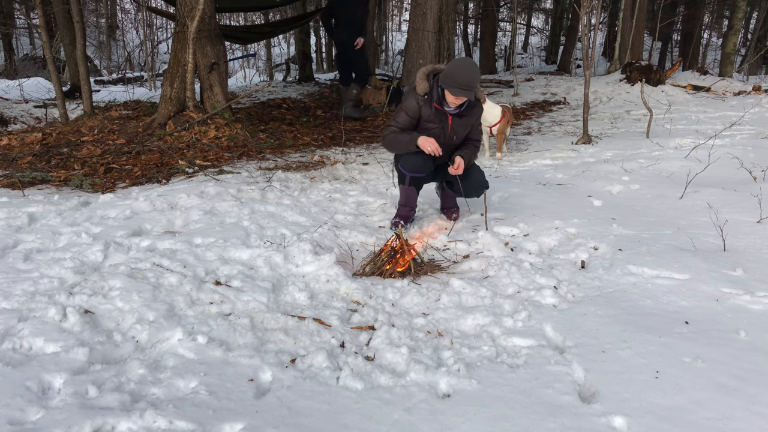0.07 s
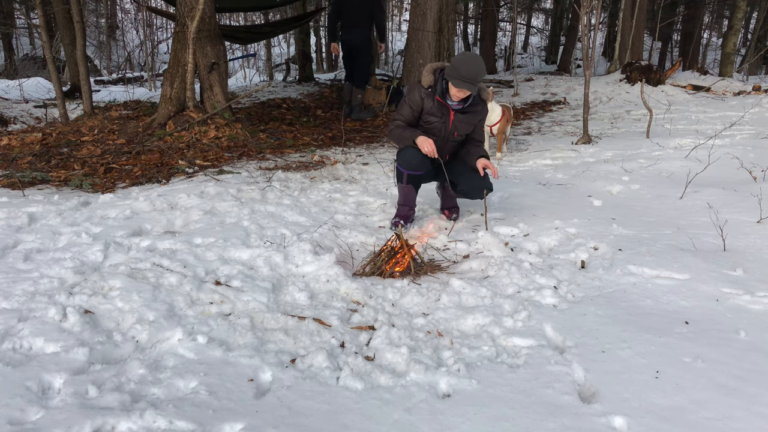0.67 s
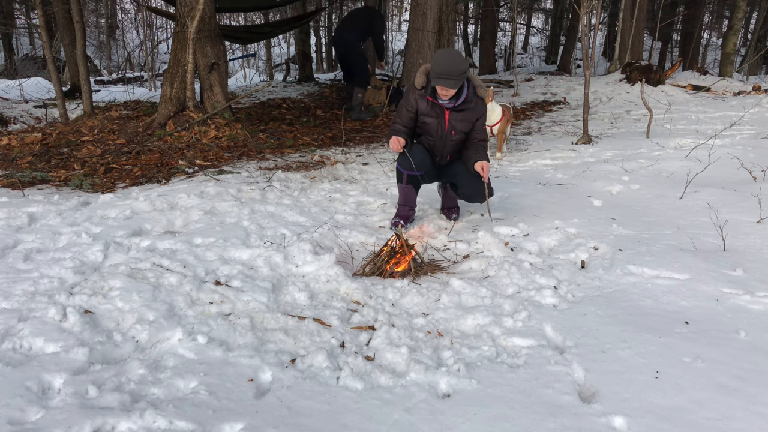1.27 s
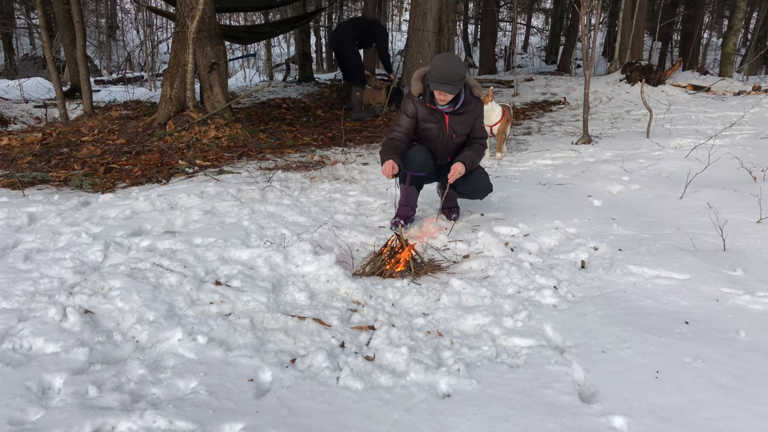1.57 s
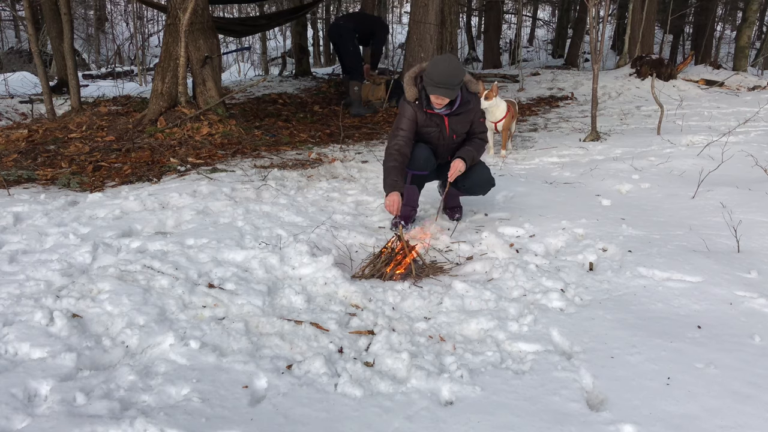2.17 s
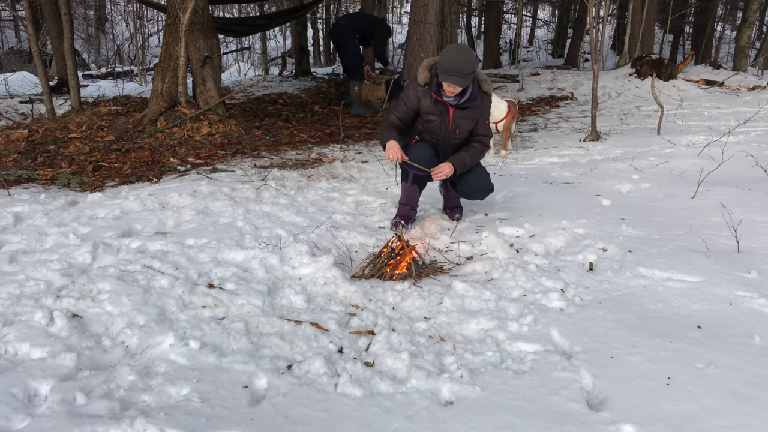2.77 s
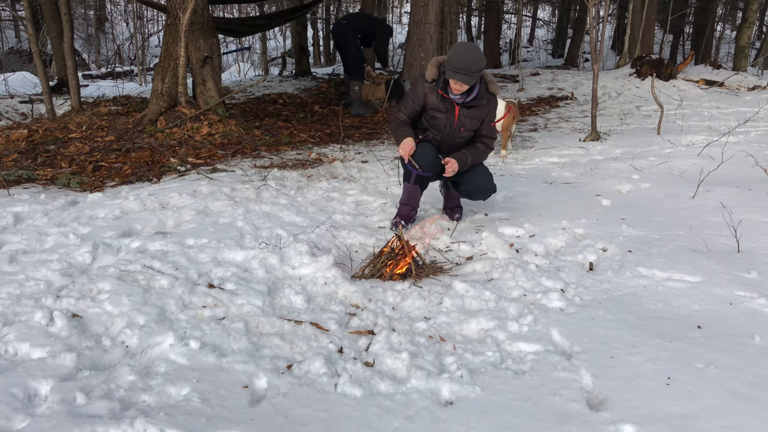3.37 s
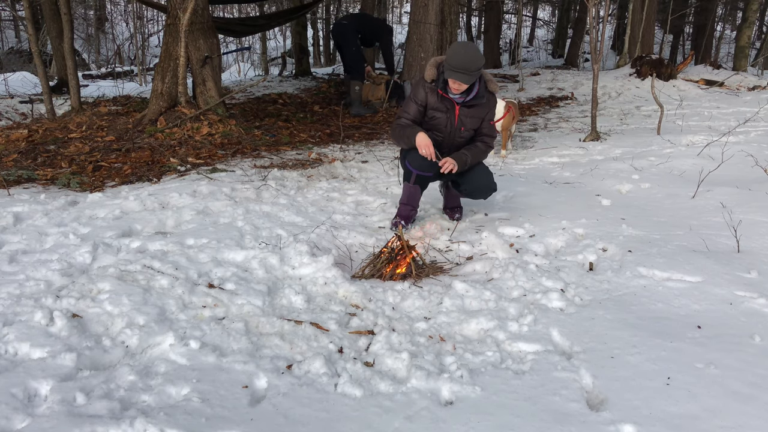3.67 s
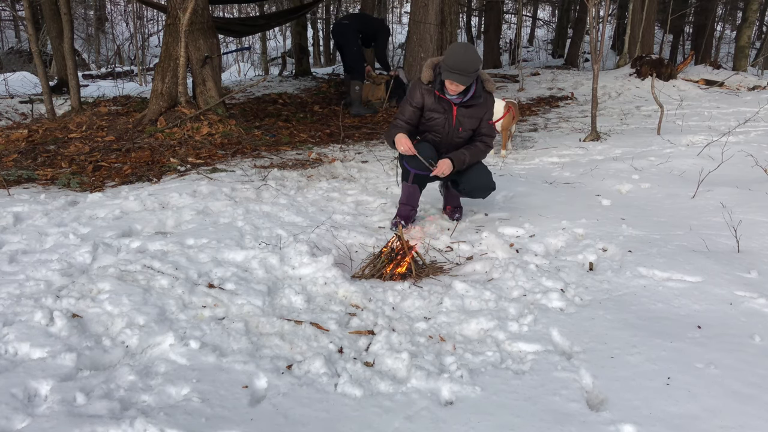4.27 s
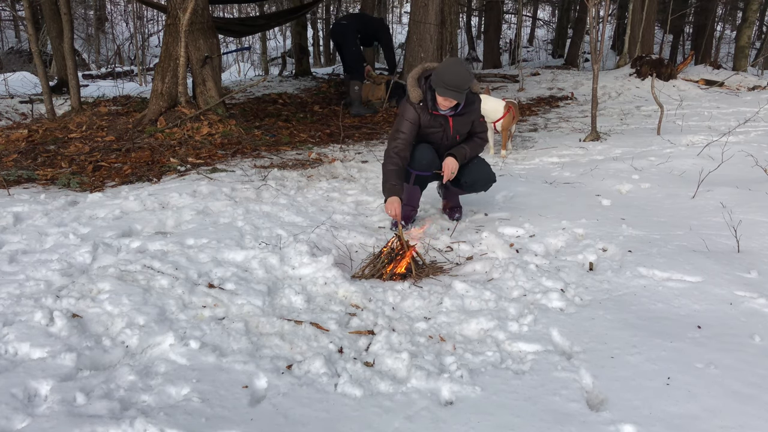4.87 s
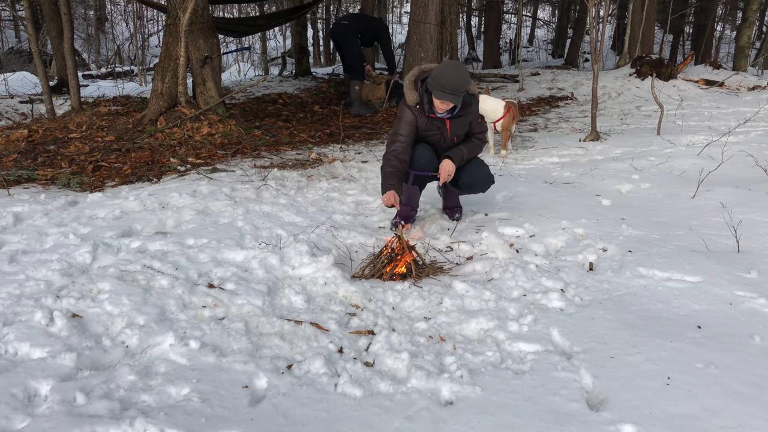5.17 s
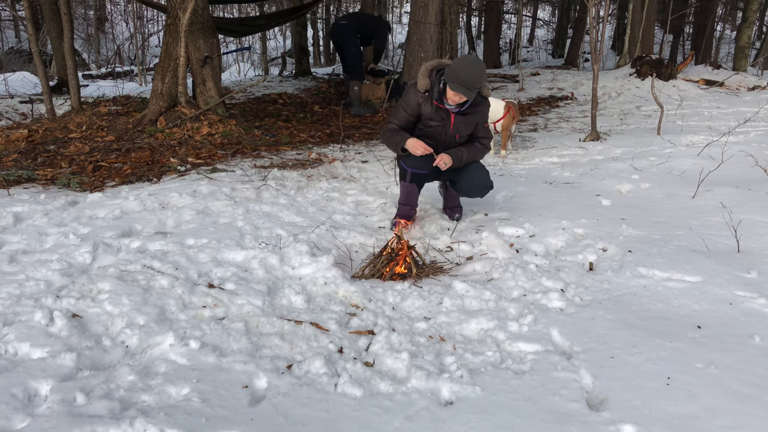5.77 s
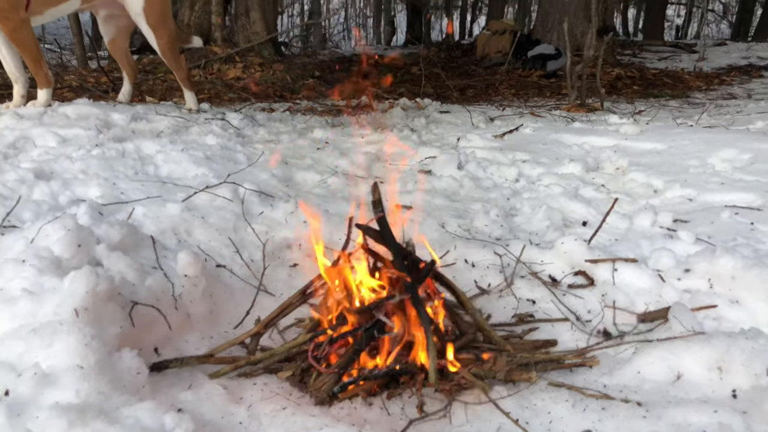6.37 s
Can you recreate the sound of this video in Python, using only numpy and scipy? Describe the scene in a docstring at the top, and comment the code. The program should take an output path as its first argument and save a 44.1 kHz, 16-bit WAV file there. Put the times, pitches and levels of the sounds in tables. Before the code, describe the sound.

A small twig fire crackles outdoors at the edge of a snowy wood, with sharp, irregular pops over a faint hiss and a low rush of flames. Beside it a few sticks are snapped, each with a slight echo off the trees, among soft thuds and light jacket rustle. A far bird gives one brief, faint note. Near the end the flames flutter closer to the microphone and one loud pop cracks.

```python
"""A small twig fire on snow at the edge of a wood, on one microphone. Gas pockets pop, scatter in the
pile and let out a fading hiss of steam over the low rush of the flames. Someone crouched beside it
breaks sticks fibre by fibre, and the trunks echo them. A jacket rustles, handling and breaking give
soft low thuds, and a far bird calls once in the wash of the wood. Near the end the background dips
briefly, then the flames flutter close to the microphone."""
import sys
import numpy as np
from scipy import signal
from scipy.fft import rfft, irfft
from scipy.io import wavfile
from scipy.ndimage import uniform_filter1d

SR = 44100
rng = np.random.default_rng(int(sys.argv[2]) if len(sys.argv) > 2 else 0)


def digitize_waveform(pressure):
    """Quantize a signal to 16-bit integers and store it at the path in sys.argv[1].

    Rows of a 2-D input are taken as channels; values are limited to [-1, 1].
    """
    field = np.atleast_2d(pressure).T
    bounded = np.clip(field, -1, 1)
    quanta = np.round(bounded * 32767).astype(np.int16)
    wavfile.write(sys.argv[1], SR, quanta)


N = 282681
TIME = np.arange(N) / SR

# spectra of the distant wood, the flames and the sizzling sap: f/Hz, relative level/dB
AIR_SPECTRUM = [(150, -5), (350, 0), (600, 0.5), (1100, 1), (1800, -2.5), (3000, -10), (5000, -17),
                (12000, -23)]
FLAME_SPECTRUM = [(20, -41), (42, -11.5), (70, 2), (110, 0.5), (200, -7), (330, -9.5), (700, -23),
                  (1500, -50)]
SIZZLE_SPECTRUM = [(1500, -1), (3000, 1.5), (5000, 2.5), (8000, 0.5), (11000, -4), (15000, -2.5),
                   (16000, -4)]
# low rush of the flames, louder from close by: t/s, level/dB
FLAME_LEVELS = [(0, -57), (2.2, -55.5), (4.2, -59), (5.2, -54), (5.88, -58), (5.94, -49.5), (6.41, -47.5)]
# fine hiss of sap and cloth: t/s, relative level/dB
HISS_LEVELS = [(0, -59.5), (.25, -54), (.48, -68), (.68, -54), (.98, -67.5), (1.6, -62), (2.35, -63),
               (2.55, -61), (3.1, -58), (3.85, -65), (4.05, -72), (4.25, -73), (4.42, -60), (4.75, -70.5),
               (5.9, -65), (6.41, -53.5)]
# brief dip of the background: t/s, gain/dB
BACKGROUND_DIP = [(5.855, 0), (5.89, -13), (5.905, 0)]
# the far bird's note: t/s, length/s, f/Hz
BIRD_NOTE = (5.611, .028, 930)
# brushes of sleeve and twig: middle t/s, length/s, centre f/Hz, level/dB
SLEEVE_BRUSHES = [(0.213, 0.13, 1200, -53), (2.42, 0.12, 4630, -56.5), (2.808, 0.15, 7300, -62),
                  (3.792, 0.098, 7200, -55), (3.9, 0.25, 8300, -56), (5.064, 0.057, 870, -51),
                  (6.021, 0.045, 1090, -48), (6.35, 0.14, 5800, -50.5)]
# tongues of flame tearing loose: middle t/s, length/s, centre f/Hz, level/dB
FLAME_PUFFS = [(5.96, 0.073, 154, -46.5), (6.155, 0.062, 127, -43.5), (6.27, .19, 148, -40.5)]
# soft low thuds, from handling and from sticks breaking: t/s, level/dB, lowest mode f/Hz
LOW_THUDS = [(.152, -38, 119.5), (1.15, -42, 128), (1.239, -46.5, 254), (1.762, -36.5, 111),
             (2.144, -38, 171), (2.953, -36, 116), (5.056, -32, 128), (5.905, -35, 224),
             (6.031, -25.5, 203)]
# modes of a thud: multiple of the lowest, relative level/dB, t60/s
LOW_THUD_MODES = [(1, 1, 0.068), (2.52, -7.5, 0.065)]
# what the trees scatter back: f/Hz, relative level/dB
TREE_SPECTRUM = [(500, -13.5), (1300, -11), (3500, 2.5), (7000, 0.5), (13000, -1)]
# echoes off single trunks: delay/s, relative level/dB
TRUNK_ECHOES = [(0.0235, -22.5), (0.0359, -15)]
# sticks breaking: t/s, crack level/dB, then relative to it body/dB, middle/dB, top/dB; length/ms
STICK_SNAPS = [(2.1369, 4, -11.5, -2.5, -1, 3), (2.9488, 8.5, 7.5, -2.5, 0, 3.34),
               (3.6035, 4.5, -4.5, -7.5, -5.5, 4.9), (4.4566, 5.5, 4, -6.5, -5, 4.6)]
# gas pockets bursting: t/s, crack level/dB, then relative to it body/dB, top/dB
GAS_POPS = [(.0446, 3, -14.5, 0), (.0672, -2, -5, -5), (0.1449, -17.5, 8.5, 4), (.2069, -9.5, -0.5, -2),
            (0.4214, -19.5, 1, -3), (0.5506, -4.5, 7.5, 2.5), (0.5939, -7.5, -2, -1), (0.6288, -11, -1, -8),
            (0.7037, -8.5, 1.5, -7), (0.842, -0.5, -8, -7.5), (0.8732, -18.5, 6, -12),
            (1.1303, -4, -2, -11), (1.1487, -3.5, -9, -4), (1.1716, -16, 7, -2), (1.2442, -7.5, 8.5, -9),
            (1.3864, 6, -17, -2), (1.6498, -5.5, -16, -3), (1.6861, -8.5, -19, -8),
            (1.7608, -12.5, 0.5, 3.5), (1.8465, -17.5, -1, 6), (1.8715, -2.5, -21, -4),
            (1.9007, -13.5, 12.5, -2), (1.948, -16, -6, 0), (2.215, -3, -4, 1.5), (2.2287, -12.5, 4, 5),
            (2.321, -8.5, -23, 1.5), (2.4161, -19.5, -7, -2), (2.5992, -14, -1, 0), (2.7942, -10.5, -2, -7),
            (2.8853, -13, 4, -6), (3.0596, -11, 0.5, -5), (3.1909, 17, -13.5, -1), (3.3312, -1, -6, 1),
            (3.4033, -13, -2, 2), (3.4083, -7.5, 3, -2), (3.4779, -2, 0.5, -3), (3.4906, 0.5, -8.5, -3.5),
            (3.758, -18.5, 10, 0), (4.1127, -20.5, 3.5, 4), (4.1488, -18.5, 3, -5), (4.1741, -12, -24, -6),
            (4.2934, -19, 7, -1), (4.4405, -11, -2, -1), (4.4523, -6, -8, -8), (4.7617, -7, -9.5, 0),
            (4.8356, -14, -14, 2), (4.9161, 6, -11.5, 2), (4.9708, 10, -3.5, -5), (5.0456, -12.5, 7.5, -3),
            (5.1585, -6.5, -6, -0.5), (5.189, -6.5, 1.5, -3), (5.2635, 12.5, -6, -7.5),
            (5.372, -14.5, 1, -6), (5.5394, 3, -15.5, -5), (5.6244, -11.5, -3.5, 2.5),
            (5.6981, -17, 0.5, -1), (5.9256, 10.5, -3.5, -5.5), (5.976, 5.5, -6.5, -8.5),
            (6.2058, 5.5, -9.5, -7.5), (6.3007, -6, -6, -6), (6.3208, -13.5, -2, -3),
            (6.4005, 24, -7.5, -5.5)]


def undb(db):
    """Decibels to gain."""
    return 10 ** (np.asarray(db) / 20)


def unit(x):
    """Scale to an energy of one."""
    return x / np.sqrt(np.sum(x ** 2))


def add(out, x, start):
    """Mix x into out from a time in seconds."""
    i = max(int(round(start * SR)), 0)
    out[i:i + len(x)] += x[:max(len(out) - i, 0)]


def level_db(points):
    """Join (t/s, level/dB) points over the whole scene."""
    return np.interp(TIME, *np.transpose(points))


def spectrum_db(points, size):
    """Join (f/Hz, level/dB) points on a log-frequency axis over the bins of a transform."""
    hz, db = np.transpose(points)
    return np.interp(np.log(np.fft.rfftfreq(size, 1 / SR) + 1), np.log(hz), db)


def colour(x, points):
    """Give x a spectrum and an rms of one."""
    shaped = rfft(x) * undb(spectrum_db(points, len(x)))
    return unit(irfft(shaped, len(x))) * np.sqrt(len(x))


def causal(db):
    """The quickest impulse response with these gains (minimum phase)."""
    cepstrum = irfft(np.log(undb(db)))
    half = len(cepstrum) // 2
    cepstrum[1:half] *= 2
    cepstrum[half + 1:] = 0
    return irfft(np.exp(rfft(cepstrum)))


def walk(rate_hz):
    """Smooth random drift with a spread near one."""
    hold = int(SR / rate_hz)
    steps = np.repeat(rng.standard_normal(N // hold + 1), hold)
    return uniform_filter1d(uniform_filter1d(steps, hold), hold)[:N] * np.sqrt(2)


def grit(size, grain_db):
    """Grainy noise: every sample has a random level of its own."""
    return rng.standard_normal(size) * undb(grain_db * rng.standard_normal(size))


def distant_air(db=-56, sway_db=1.13):
    """The even wash of the wood, far behind the fire."""
    return colour(rng.standard_normal(N), AIR_SPECTRUM) * undb(db + sway_db * walk(14))


def far_bird(db=-42, second_db=-5, waver=.008, tail_db=-8, tail_s=.03):
    """One short note of two harmonics, smeared by the trees on its way to the microphone."""
    start, length, pitch_hz = BIRD_NOTE
    out, t = np.zeros(N), np.arange(SR // 4) / SR
    phase = 2 * np.pi * np.cumsum(pitch_hz * (1 + waver * walk(200)[:len(t)])) / SR
    gate = np.interp(t, [0, length / 10, length / 2, length], [0, 1, 1, 0])
    note = undb(db) * gate * (np.sin(phase) + undb(second_db) * np.sin(2 * phase))
    smear = unit(rng.standard_normal(len(t)) * np.exp(-t / tail_s))
    add(out, note, start)
    add(out, undb(tail_db) * signal.fftconvolve(note, smear), start + length / 2)
    return out


def wood_echo(x, echo_db, trunk_db, gap_s=0.017, early_s=0.018, late_s=0.031, late_db=-14, grain_db=5.5):
    """Snow swallows the near reflections; after a gap the trees return a fading wash of small echoes."""
    t = np.arange(int(SR * .7)) / SR
    since = np.maximum(t - gap_s, 0)
    power_fade = np.exp(-since / early_s) + undb(late_db) ** 2 * np.exp(-since / late_s)
    power_fade *= np.minimum(since / 0.002, 1)
    grain = unit(undb(grain_db * rng.standard_normal(N))) * np.sqrt(N)
    out, edges_hz = np.zeros(N), np.geomspace(400, 16000, 8)
    for low, high in zip(edges_hz, edges_hz[1:]):
        band = signal.butter(2, [low, high], "band", fs=SR, output="sos")
        # echoes from all sides add in power, not in phase
        power = signal.fftconvolve(signal.sosfilt(band, x) ** 2, power_fade / power_fade.sum())
        carrier = unit(signal.sosfilt(band, grain * rng.standard_normal(N)))
        tree_db = np.interp(np.sqrt(low * high), *np.transpose(TREE_SPECTRUM))
        out += carrier * np.sqrt(N * power[:N].clip(0)) * undb(echo_db + tree_db)
    # a trunk mirrors only waves shorter than its girth
    bright = signal.sosfilt(signal.butter(1, 2500, "high", fs=SR, output="sos"), x)
    for delay, db in TRUNK_ECHOES:
        add(out, undb(db + trunk_db) * bright, delay)
    return out


def low_thuds(contact_s=0.0029):
    """Handling and breaking sticks give soft thuds, each of two low, quickly damped modes."""
    out, t = np.zeros(N), np.arange(SR // 6) / SR
    for start, db, hz in LOW_THUDS:
        ring = sum(undb(mode_db - 60 * t / t60) * np.sin(2 * np.pi * hz * multiple * t)
                   for multiple, mode_db, t60 in LOW_THUD_MODES)
        add(out, undb(db) * ring * np.minimum(t / contact_s, 1), start)
    return out


def swells(table, width, grain_db):
    """Brief swells of grainy noise, each around one pitch."""
    out = np.zeros(N)
    for middle, length, hz, db in table:
        size = int(length * SR)
        hump = [(hz / 4, -30), (hz / (1 + width), -9), (hz, 0), (hz * (1 + width), -9), (hz * 8, -60)]
        noise = colour(grit(size, grain_db), hump)
        add(out, undb(db) * noise * np.hanning(size), middle - length / 2)
    return out


def jacket_rustle():
    """Friction of sleeve and twig beside the fire."""
    return swells(SLEEVE_BRUSHES, width=0.43, grain_db=3.5)


def flame_puffs():
    """Burning gas tears loose in low puffs close to the microphone."""
    return swells(FLAME_PUFFS, width=0.58, grain_db=-3.5)


def flame_rush(flutter_db=1.34):
    """Turbulent flames: a low noise that flutters as they lick upward."""
    roar = colour(rng.standard_normal(N), FLAME_SPECTRUM)
    return roar * undb(level_db(FLAME_LEVELS) + flutter_db * walk(22))


def steam_level_db(jet_db=-62, db_per_crack_db=0.49, attack_s=0.014, fade_s=0.17):
    """Level of the hiss: every loud pop opens a jet of steam that fades back into the sizzle."""
    power, t = undb(level_db(HISS_LEVELS)) ** 2, np.arange(SR) / SR
    jet = np.minimum(t / attack_s, 1) * np.exp(-t / fade_s)
    for start, crack_db, _, _ in GAS_POPS:
        add(power, (undb(jet_db + db_per_crack_db * crack_db) * jet) ** 2, start)
    return 10 * np.log10(power)


def sizzle(db, grain_db=4.5, flicker_db=3.0, gain_db=1.0):
    """Boiling sap and rubbing cloth: a fine, grainy hiss."""
    return colour(grit(N, grain_db), SIZZLE_SPECTRUM) * undb(db + gain_db + flicker_db * walk(70))


def twig(push, crack_db, body_db, middle_db, top_db, size=1024):
    """A push sounds through one twig: its broad colour plus uneven, heavily damped resonances."""
    shape = [(40, body_db - 36.5), (200, body_db - 4.5), (550, body_db - 6.0), (1200, body_db + .5),
             (3300, middle_db - .5), (7500, 1.0), (12500, top_db), (16000, top_db - 8.5)]
    resonance_hz = np.geomspace(2000, 16000, 18)
    ripple = np.column_stack([resonance_hz, rng.uniform(-2.2, 2.2, len(resonance_hz))])
    response = causal(crack_db + spectrum_db(shape, size) + spectrum_db(ripple, size))
    return signal.fftconvolve(push, response)


def burst(scatter_db, scatter_s=0.0015, linger_s=0.0062, linger_db=-22, stick_hz=2200, size=1024):
    """One sharp pulse, then a few milliseconds of reflections among the sticks."""
    t = np.arange(size) / SR
    fade = np.exp(-t / scatter_s) + undb(linger_db) * np.exp(-t / linger_s)
    fade *= np.minimum(t / 0.00051, 1) ** 2
    # long waves pass round thin sticks, so only the treble is scattered
    treble = signal.butter(2, stick_hz, "high", fs=SR, output="sos")
    push = undb(scatter_db) * unit(signal.sosfilt(treble, rng.standard_normal(size) * fade))
    push[0] += 1  # the direct pulse
    return unit(push)


def stick_snaps(first_db=-8, fibre_body_db=-13, release_s=0.00058, linger_db=-26, linger_s=0.03):
    """A stick gives with one deep crack, then its fibres tear in a dense, bright run until it parts."""
    out, t = np.zeros(N), np.arange(1400) / SR
    for start, crack_db, body_db, middle_db, top_db, length_ms in STICK_SNAPS:
        middle_db -= 2  # softer middle in both crack and fibres
        since_parting = np.maximum(t - length_ms / 1000, 0)
        fade = np.exp(-since_parting / release_s) + undb(linger_db) * np.exp(-since_parting / linger_s)
        fibres = unit(grit(len(t), grain_db=3) * fade)
        add(out, twig(fibres, crack_db, body_db + fibre_body_db, middle_db, top_db), start)
        # the first crack carries nearly all of the body but little of the treble
        push = burst(scatter_db=-8)
        add(out, twig(push, crack_db + first_db, body_db - first_db, middle_db - first_db, top_db), start)
    return out


def bark_ticks(sizzle_db, above_db=25.5, spread_db=4.8, body_db=-7, middle_db=-4, vary_db=5, count=130):
    """Tiny pops in the bark, mostly faint, louder while the fire sizzles."""
    out = np.zeros(N)
    for when, luck, body, top in rng.random((count, 4)):
        crack_db = sizzle_db[int(when * N)] + above_db + spread_db * min(-np.log(luck), np.pi)
        tick_body_db = body_db + vary_db * (2 * body - 1)
        top_db = vary_db * (2 * top - 1)
        add(out, twig(burst(scatter_db=-16), crack_db, tick_body_db, middle_db, top_db), when * TIME[-1])
    return out


def gas_pops(scatter_per_body=0.3, middle_per_body=0.4):
    """Gas pockets burst: shallow ones thin and clean, those deep in the pile hollow and scattered."""
    out = np.zeros(N)
    for start, crack_db, body_db, top_db in GAS_POPS:
        push = burst(scatter_db=-8 + scatter_per_body * body_db)
        middle_db = -1 + middle_per_body * body_db
        add(out, twig(push, crack_db, body_db, middle_db, top_db), start)
    return out


def scene(fire_to_trees_db=-12):
    """Low in its snow hollow, the fire reaches the trees more weakly than the sticks held above it."""
    sizzle_db = steam_level_db()
    fire = gas_pops() + bark_ticks(sizzle_db)
    sticks = stick_snaps()
    echoes = wood_echo(sticks + undb(fire_to_trees_db) * fire, echo_db=-12.0, trunk_db=-3.0)
    handling = low_thuds() + jacket_rustle()
    background = (flame_rush() + distant_air() + sizzle(sizzle_db)) * undb(level_db(BACKGROUND_DIP))
    return (fire + sticks + echoes + handling + flame_puffs() + far_bird() + background)[None]


def record(dry, lag_hz=550, lag_q=1.3, overload=1.3, top_hz=16300):
    """The microphone passes the lows a little late and overloads on the sharpest pops."""
    _, poles = signal.iirpeak(lag_hz, lag_q, fs=SR)
    lagged = signal.lfilter(poles[::-1], poles, dry)  # all-pass
    # the highest treble is cut off above about 16 kHz
    low_pass = signal.firwin(161, top_hz, window=("kaiser", 9), fs=SR)
    return signal.fftconvolve(np.clip(lagged, -overload, overload), low_pass[None], mode="same")


dry = scene()
out = record(dry)
digitize_waveform(out)
```